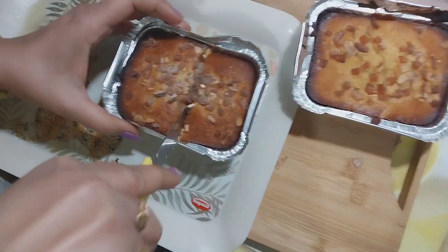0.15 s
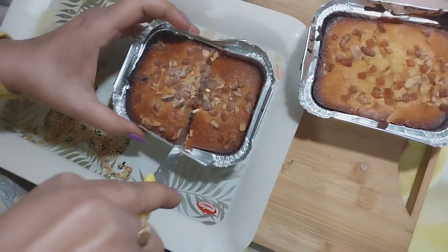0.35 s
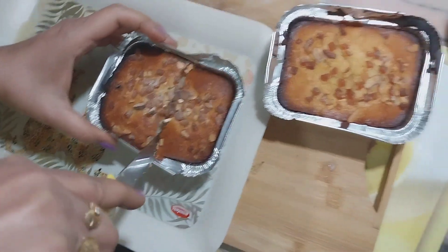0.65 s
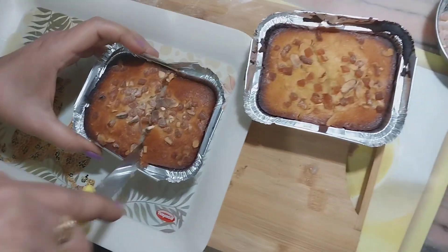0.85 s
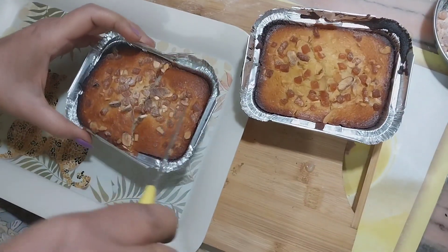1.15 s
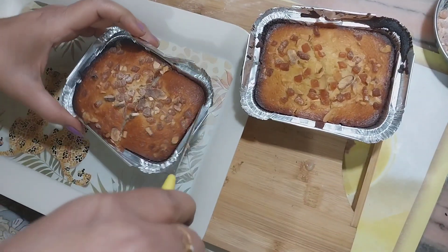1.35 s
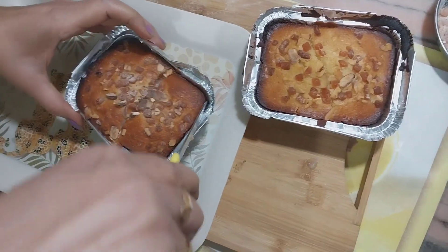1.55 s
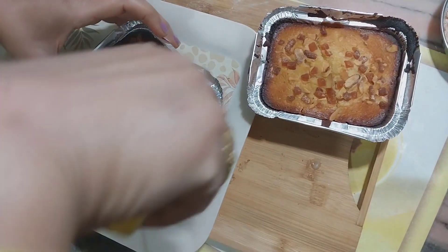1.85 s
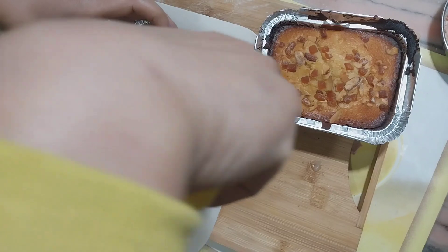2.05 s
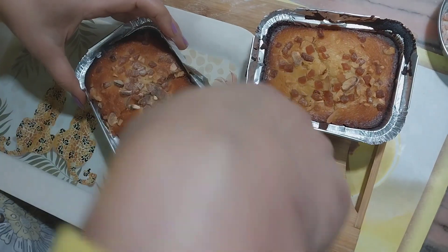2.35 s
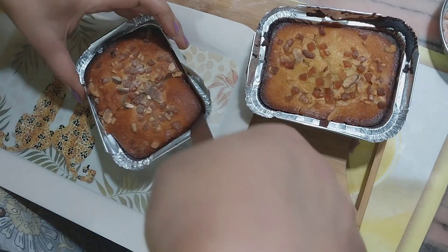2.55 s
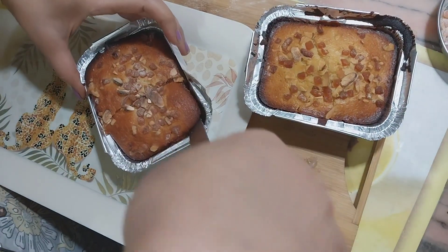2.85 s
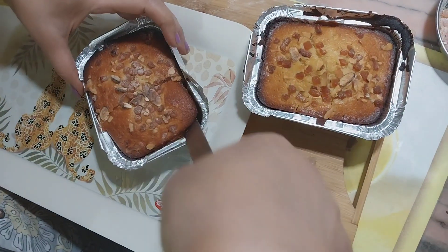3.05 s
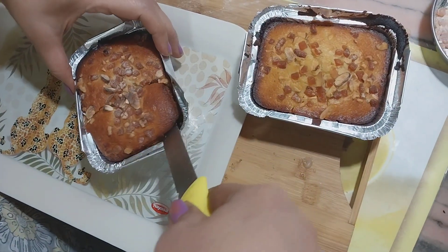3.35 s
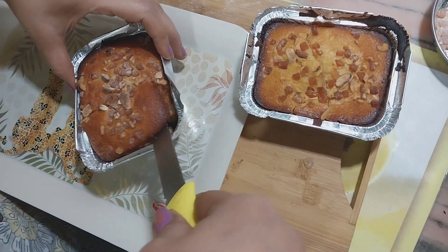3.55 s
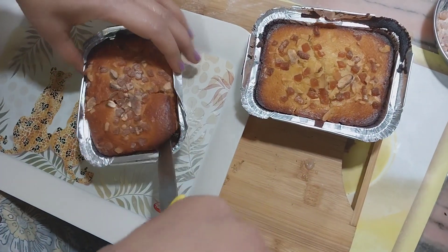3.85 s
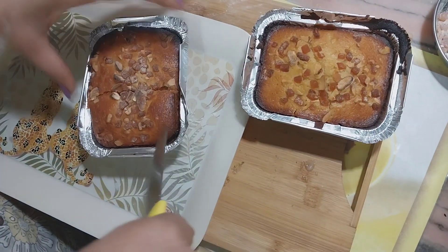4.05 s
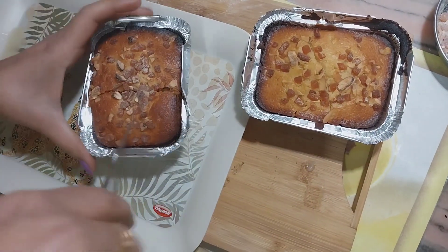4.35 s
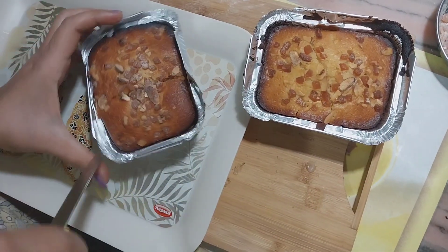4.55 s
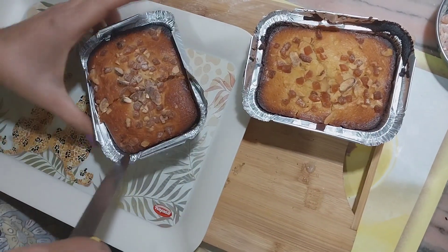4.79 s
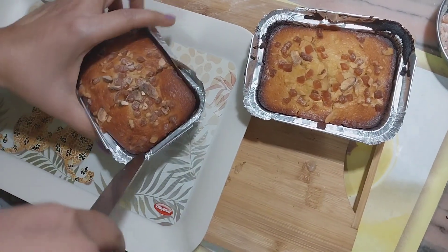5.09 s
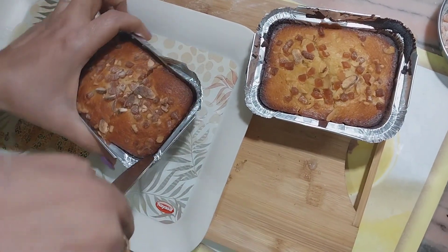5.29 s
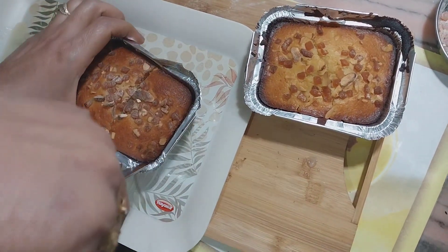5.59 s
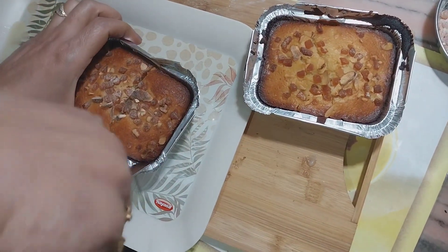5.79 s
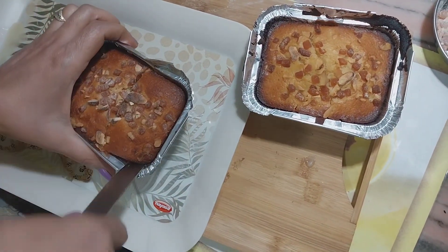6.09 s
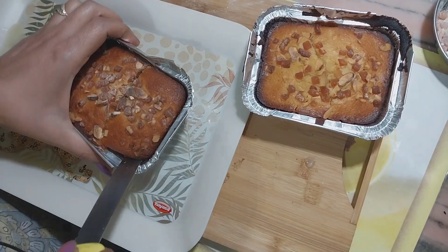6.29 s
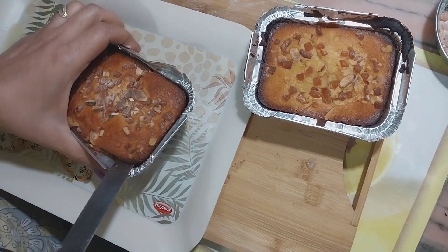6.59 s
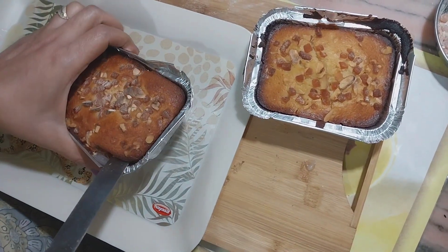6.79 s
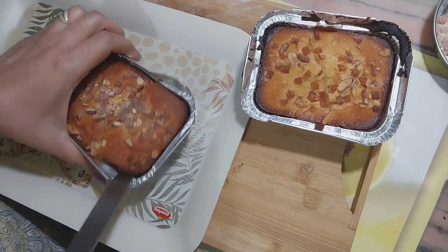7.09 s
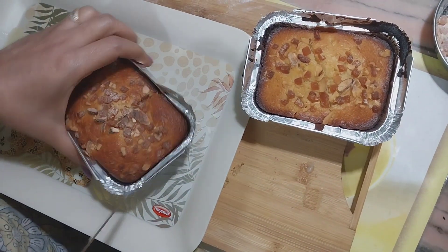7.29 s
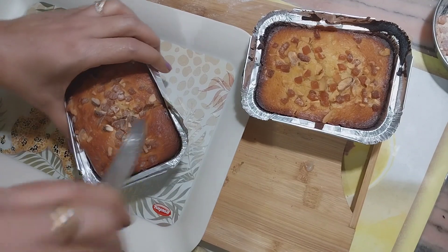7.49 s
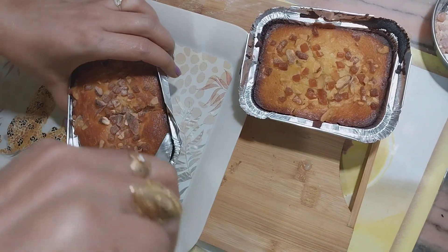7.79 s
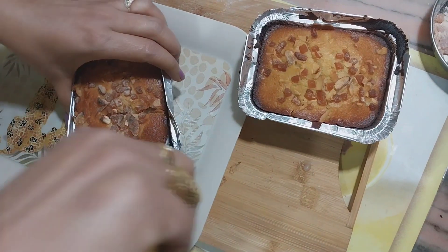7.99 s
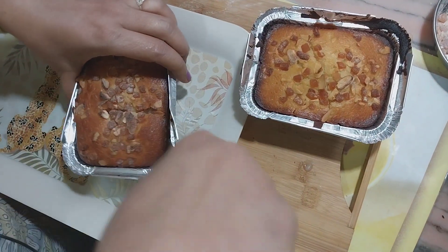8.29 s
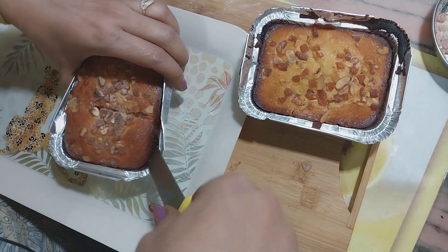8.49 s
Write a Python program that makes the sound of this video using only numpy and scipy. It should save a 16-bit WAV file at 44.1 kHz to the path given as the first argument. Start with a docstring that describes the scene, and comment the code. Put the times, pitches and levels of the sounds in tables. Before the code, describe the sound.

Silence until about 0.75 s, when quiet room air and hiss start abruptly with a knife sliding over a foil rim, ending in a tick near 1.1. Light ticks and faint scrapes follow at 1.6-2.3, then duller knocks with a soft tray boom around 2.4. Scrapes and ticks cluster at 2.8-3.1, with a slight blade ring; a quiet gap follows. At 3.9 the pan clacks, then scrapes, ticks and rubbing continue, with sharp clicks at 4.5-4.8. A calmer stretch has soft dragging, then snaps at 5.5 and a dull bump at 5.6. Rougher foil scraping around 6.0 leads to the loudest clack and low boom at 6.2, then pan rubs and ticks to 6.8. A swelling scrape at 7.3 ends in hard knocks at 7.45. Sparse faint strokes follow, with a last tick and thump at 8.4. Close, dry, short kitchen echo.

```python
"""In a quiet kitchen, a table knife works a baked cake loose from its foil tray on a plastic serving tray.
The blade slides, scrapes and judders as filtered stick-slip grains; ticks and crinkles are dispersed pushes.
The pan rubs as grains and clacks as decaying modes; the serving tray rumbles as noise and booms as modes.
Blade and foil carry a short echo to a microphone close above; the sound cuts in after a silent start."""
import sys
import numpy as np
from scipy import signal
from scipy.fft import rfft, irfft, next_fast_len
from scipy.io import wavfile

SR = 44100
rng = np.random.default_rng(int(sys.argv[2]) if len(sys.argv) > 2 else 0)


def bounce(signal):
    """Save signal as a 16-bit WAV file at the path given by the first command-line argument."""
    frames = np.transpose(np.atleast_2d(signal))
    limited = np.clip(frames, -1, 1)
    pcm = np.round(limited * 32767).astype(np.int16)
    wavfile.write(sys.argv[1], SR, pcm)


N = 381024
TIME = np.arange(N) / SR  # s
START_S, TOP_HZ = .745, 15600  # moment the sound switches on, upper band limit
ATTACK_S, RELEASE_DB_PER_S = 0.014, 340  # blade strokes
SHOVE_ATTACK_S, SHOVE_RELEASE_DB_PER_S = 0.012, 182  # pan strokes
TICK_RING_DB = 11.5  # how far the touched spot's ring stands out


def undb(db):
    """Level to amplitude: 20 dB is a factor of ten."""
    return 10 ** (np.asarray(db) / 20)


def unit(x):
    """Normalisation: scale to an rms of 1."""
    return x / np.sqrt(np.mean(x ** 2))


def fade(t, t60):
    """Exponential damping: amplitude falls by 60 dB in t60 seconds."""
    return np.exp(-np.log(1000) * t / t60)


def add(track, s, sound):
    """Superposition: mix a sound into the track from time s."""
    i = int(s * SR)
    track[i:i + len(sound)] += sound[:N - i]


def colour(x, points, peaks=()):
    """Minimum-phase filtering: a smooth spectrum with resonant peaks, made causal through its cepstrum."""
    size = next_fast_len(len(x), real=True)
    f = np.fft.rfftfreq(size, 1 / SR)
    hz, db = np.transpose(points)
    curve = np.interp(np.log(f + 1), np.log(hz), db)
    for centre, width, boost in peaks:
        curve = curve + boost / (1 + (2 * (f - centre) / width) ** 2)
    cepstrum = irfft(np.log(undb(curve)), size)
    # fold the negative times onto the positive ones
    cepstrum[1:size // 2] *= 2
    cepstrum[size // 2 + 1:] = 0
    response = np.exp(rfft(cepstrum))
    return irfft(rfft(x, size) * response, size)[:len(x)]


def walk(rate):
    """Random modulation: straight lines join Gaussian values drawn rate times a second."""
    knots = rng.standard_normal(4096)
    return np.interp(TIME * rate, np.arange(len(knots)), knots)


def grains(rate, spread_db, patchy_db):
    """Stick-slip friction: tiny random slips of uneven size, with slowly varying strength."""
    hit = rng.random(N) < rate / SR
    size = undb(spread_db * np.minimum(rng.exponential(size=N), np.pi))
    sign = rng.choice([-1, 1], N)
    strength = undb(patchy_db * walk(90))
    return unit(hit * size * sign * strength)


def stroke(start, length, db, swell_db, attack, release):
    """Force envelope: a stroke bites, swells or eases to db at its end, then dies away."""
    gain = np.zeros(N)
    t = TIME[:int((length + .5) * SR)]
    swell = swell_db * (np.minimum(t / length, 1) - 1)
    level = db + swell - release * np.maximum(t - length, 0)
    add(gain, start, undb(level) * np.minimum(t / attack, 1))
    return gain


def blade_strokes(table):
    """Force and response: each blade stroke drives the pan's body and the thin contact in its own proportion."""
    body, edge = np.zeros(N), np.zeros(N)
    for start, length, db, swell_db, treble_db in table:
        gain = stroke(start, length, db, swell_db, ATTACK_S, RELEASE_DB_PER_S)
        body += gain
        edge += undb(treble_db) * gain
    return body, edge


def ring(events, modes):
    """Modal vibration: each (s, dB) blow starts the same decaying sine modes."""
    t, out = TIME[:SR // 2], np.zeros(N)
    tone = sum(undb(db) * np.sin(2 * np.pi * hz * t) * fade(t, t60) for hz, db, t60 in modes)
    for s, db in events:
        add(out, s, undb(db) * tone)
    return out


# Spectrum of the room air and hiss: pitch_hz, relative level_db [dB per Hz]
HUSH_SPECTRUM = [(15, -37), (25, -7), (86, 1), (209, -11), (267, -10), (389, -19), (1110, -16), (2300, -28),
                 (3340, -32), (4500, -30), (7100, -22), (9810, -27), (15500, -40)]


def hush(mid_db=-69, side_db=-11):
    """Partly coherent noise: still room air and microphone hiss, almost alike on both sides."""
    mid, side = (unit(colour(rng.standard_normal(N), HUSH_SPECTRUM)) for _ in range(2))
    return undb(mid_db) * (mid + undb(side_db) * side * np.array([[1], [-1]]))


# Level of the tray's low rumble under the hands: time_s, relative level_db
RUMBLE_LEVEL = [(0.85, -80), (0.93, -65.5), (1.47, -58), (3.21, -73), (3.55, -78.5), (4.09, -61.5),
                (5.29, -72), (5.59, -66), (6.17, -47.5), (6.37, -67.5), (7.15, -73), (7.34, -67),
                (7.88, -70), (8.62, -62.5)]
# Spectrum of the rumble: pitch_hz, relative level_db [dB per Hz]
RUMBLE_SPECTRUM = [(20, -14), (50, -27), (66, -5.5), (78, 9.5), (95, -7.5), (130, -11.5), (200, -7.5),
                   (500, -76)]
# Pan dragged and turned on the tray: start_s, length_s, relative level_db at the end, swell_db from start to end
SHOVES = [(1.106, 0.33, -75.5, -17), (2.095, 0.39, -56, 5), (3, 0.073, -53, -8.5),
          (3.901, 0.032, -42.5, -11), (3.992, 0.51, -71.5, -13), (4.518, 0.047, -55.5, -3),
          (4.768, 0.88, -62, 1.5), (5.734, 0.61, -49.5, 1), (6.352, 0.21, -46.5, 14),
          (6.584, 0.075, -41, 3), (6.692, 0.26, -55, -6), (6.947, 0.14, -63, 10), (7.087, 0.4, -53, -2.5),
          (7.868, 0.052, -60.5, 9), (8.116, 0.17, -59.5, 6), (8.422, 0.083, -56.5, -5.5)]
# Spectrum of the rubbing pan: pitch_hz, relative level_db [dB per Hz]
RUB_SPECTRUM = [(50, -10.5), (150, -2), (260, -7.5), (430, -5.5), (680, -6), (950, -8), (1400, -18.5),
                (2300, -51), (6000, -47)]
# Resonances of the pan dragged over the tray: pitch_hz, width_hz, boost_db
RUB_PEAKS = [(267.8, 58, 16.5), (352.2, 26, 10.5), (628, 74, 8), (650, 110, -2.5), (1180, 23, 8),
             (1358, 46, 13.5), (1860, 68, 13)]


def rub(rub_db=-4.5, rumble_db=-2.0, drag_rumble_db=-19):
    """Sliding friction: the pan drags and turns; the tray rumbles below it, more so during a shove."""
    drag = sum(stroke(*shove, SHOVE_ATTACK_S, SHOVE_RELEASE_DB_PER_S) for shove in SHOVES)
    under_hands = undb(rumble_db + np.interp(TIME, *np.transpose(RUMBLE_LEVEL)))
    weight = under_hands + undb(drag_rumble_db) * drag
    slips = colour(grains(rate=980, spread_db=0.5, patchy_db=-1.0), RUB_SPECTRUM, RUB_PEAKS)
    rumble = colour(rng.standard_normal(N), RUMBLE_SPECTRUM)
    return undb(rub_db) * drag * unit(slips) + weight * unit(rumble)


# Spectrum of the pan as a whole under friction: pitch_hz, relative level_db [dB per Hz]
BODY_SPECTRUM = [(100, -19.5), (400, -15.5), (800, -1), (1200, -3.5), (2000, -0.5), (3000, -6),
                 (5000, -12.5), (15000, -44.5)]
# Spectrum of the thin metal at the contact: pitch_hz, relative level_db [dB per Hz]
EDGE_SPECTRUM = [(500, -50), (1800, 3.5), (3200, 8.5), (5000, 5), (7500, 0), (10000, -3.5), (15000, -13.5)]


def friction(effort, peaks, slips, body_db, edge_db):
    """Friction-driven resonance: slips sound the pan as a whole and the thin metal at the contact."""
    body_effort, edge_effort = effort
    body = body_effort * unit(colour(slips, BODY_SPECTRUM, peaks))
    edge = edge_effort * unit(colour(slips, EDGE_SPECTRUM, peaks))
    return undb(body_db) * body + undb(edge_db) * edge


# Flat of the blade sliding out over the rim:
# start_s, length_s, relative level_db at the end, swell_db from start to end, treble_db re level
SLIDES = [(.75, 0.063, -64.5, -4, -1), (.86, 0.053, -54.5, 4, -3), (1.045, 0.046, -49.5, 16, -1)]
# Resonances of the sliding blade: pitch_hz, width_hz, boost_db
SLIDE_PEAKS = [(1038, 91, 14), (1744, 86, 8.5), (2330, 230, 9.5), (3130, 830, 7.5), (4200, 130, -2),
               (5990, 110, 12), (7140, 730, 11), (8230, 150, 8)]


def slide():
    """Dense stick-slip: the blade is drawn smoothly out over the rim, then leaves it."""
    slips = grains(rate=3800, spread_db=1.5, patchy_db=1.0)
    return friction(blade_strokes(SLIDES), SLIDE_PEAKS, slips, body_db=3.0, edge_db=3.0)


# Resonances of one patch of foil wall: pitch_hz, width_hz, boost_db
FOIL_PEAKS = [(1143, 57.5, 13), (1710, 33, 1.5), (2520, 17, 2.5), (3636, 68, 5.5), (3980, 330, -1.5),
              (5400, 83, -32), (6460, 550, 18.5), (8550, 190, 5), (10470, 990, 14)]


def patch(shift):
    """Scattered resonance: in another patch of foil each mode lies a little higher or lower."""
    return [(hz * np.exp(shift * rng.standard_normal()), width, db) for hz, width, db in FOIL_PEAKS]


def bend(x, travel_s=0.00118, reference_hz=1000):
    """Dispersion: bending waves carry the treble faster, so a push arrives as a tiny falling chirp."""
    f = np.fft.rfftfreq(len(x), 1 / SR)
    phase = -2j * np.pi * travel_s * np.sqrt(f * reference_hz)
    return irfft(rfft(x) * np.exp(phase), len(x))


# Resonances of the filled pan on the tray, also heard in the scrape: pitch_hz, width_hz, boost_db
PAN_PEAKS = [(260, 84, -6), (326, 26, 19.5), (551, 45, 4), (746, 32, 5.5), (1110, 72, 3), (1355, 28, 7.5),
             (1585, 60, 4), (1820, 37.3, 5.5), (2544, 13, 10), (7240, 590, 1)]


def snap(thud_db, slope_db, hz, crumple_db=-3, crumple_t60=0.036, push_hz=4500, bass_db=-9, top_db=-11,
         ring_q=6, widest_hz=500, wall_share=0.56):
    """Impulsive buckling: a short push and a brief crumple of a crease ring the touched spot and the pan."""
    t = TIME[:4096]
    push = np.exp(-2 * np.pi * push_hz * t)
    crumple = rng.standard_normal(len(t)) * fade(t, crumple_t60)
    contact = bend(push / push.sum()) + undb(crumple_db) * crumple / np.linalg.norm(crumple)
    high, air = 1.42 * slope_db, 2.5 * slope_db  # octaves above the middle of the spectrum
    tone = [(30, thud_db - 15), (160, thud_db + bass_db), (520, thud_db), (1150, 2.5), (1800, -2.5),
            (3200, high), (5000, high - 2.1), (8000, air), (15000, air + top_db)]
    spot = (hz, min(hz / ring_q, widest_hz), TICK_RING_DB)
    # only the upper wall resonances are used, differing from spot to spot; the pan supplies the lower ones
    wall = [(f, width, wall_share * db) for f, width, db in patch(shift=0.098)[3:]]
    return colour(contact, tone, [spot, *PAN_PEAKS, *wall])


# Blade and foil ticks: start_s, relative level_db, thud_db of the pan re level,
# treble slope [dB per octave], pitch_hz of the touched spot
TICKS = [(.7512, -28.5, -5, 1.5, 3390), (1.0573, -23.5, -13, 1, 7360), (1.096, -12, -29, -5, 1707),
         (1.5562, -15, -4, -2.5, 2950), (1.7468, -28, 5, -2, 1850), (1.799, -33.5, -2, 3.5, 9660),
         (1.902, -42, -7, 7, 9240), (1.848, -33.5, -25, 1.5, 1050), (1.9783, -31, -8, 2.5, 2570),
         (2.0278, -27, -25, 2, 9300), (2.0644, -26.5, -9, 0, 3640), (2.1681, -22.5, 0, 2, 1290),
         (2.2755, -24.5, 6, 0.5, 1300), (2.397, -15.5, -1, -7.5, 1150), (2.4299, -11, 4.5, -8, 1045),
         (2.8237, -16.5, -7, -4.5, 1750), (2.8448, -15.5, -11, -5, 1600), (2.9294, -16.5, -4, -1, 2430),
         (3.0043, -7, -2, -5, 1056), (3.104, -10.5, -5, -4, 2920), (3.9081, -2.5, 4, -16, 612),
         (4.0258, -21, -7, -8, 1350), (4.081, -11, -5, -6, 1100), (4.1301, -8, -14, 0, 1580),
         (4.219, -28, 16, -20, 300), (4.5272, -11, -12, -7, 1390), (4.597, -2, -22, -8, 3870),
         (4.7224, -14.5, -17, -4.5, 1240), (4.7321, -19, 11.5, -17, 980), (4.7702, -11.5, -17, 0, 1380),
         (4.7785, -2, -26, -6, 1920), (4.8132, -3.5, -6.5, -9, 994), (4.9628, -23.5, 5, -2.5, 1300),
         (5.069, -19.5, 0, -24, 1100), (5.4852, -10.5, -22, -3.5, 1870), (5.497, -3.5, -7, -2, 1830),
         (5.7135, -8.5, -4.5, 0, 1850), (5.7207, -12, 1, 1, 3550), (5.738, -10, 7, -1.5, 1230),
         (5.9315, -29.5, -1, 1.5, 636), (6.0131, -20, 8, 1, 790), (6.0626, -10.5, 10, 0, 1500),
         (6.1908, 10, 0, -15.5, 840), (6.2738, -7, 4, -15, 700), (6.2821, -7, -3, -9, 1230),
         (6.3288, -4.5, 0.5, -8, 680), (6.4423, -10, -5, -5, 7500), (6.5255, -12.5, 6, -9, 276),
         (6.6924, -9.5, 2, -7.5, 1840), (6.7836, -14, -27, -9, 1870), (6.8068, -4, -36, -8, 2120),
         (7.1124, -39.5, 14, 8, 5900), (7.3009, -19, 16, -1.5, 638), (7.3109, -9.5, 0, -12, 620),
         (7.4408, -1.5, -4, -2, 1770), (7.449, 3, 1, -3.5, 1770), (7.8481, -11, 1.5, -4, 1670),
         (8.176, -19.5, 5.5, -1.5, 1770), (8.208, -18.5, 9, 0, 1330), (8.4183, -4, -5, -7.5, 2050)]


def ticks(level_db=-7.0):
    """Impact excitation: the clear ticks of the blade on the foil."""
    out = np.zeros(N)
    for s, db, thud_db, slope_db, hz in TICKS:
        add(out, s, undb(level_db + db) * snap(thud_db, slope_db, hz))
    return out


# Strokes that judder in one resonance of the blade or the pan:
# middle_s, half_length_s [to 1/e], level_db before the room, pitch_hz, width_hz
JUDDERS = [(1.072, 0.025, -54, 3370, 420), (1.214, 0.16, -69.5, 437, 86.5), (1.663, .035, -63, 1140, 256),
           (4.343, 0.074, -65, 550, 125), (4.782, 0.0085, -41.5, 1920, 480), (5.01, .06, -69.5, 1355, 160),
           (5.497, 0.0023, -33, 1780, 288), (6.631, 0.059, -47, 642, 176), (7.68, 0.044, -65, 1120, 241),
           (8.007, 0.12, -71.5, 1400, 300), (8.095, .03, -60, 690, 220)]


def judders():
    """Resonant stick-slip: slips feed one resonance for the length of a stroke."""
    out = np.zeros(N)
    for s, length, db, hz, width in JUDDERS:
        resonance = signal.iirpeak(hz, hz / width, fs=SR)
        slips = grains(rate=2700, spread_db=3.0, patchy_db=-3.5)
        tone = signal.lfilter(*resonance, signal.lfilter(*resonance, slips))
        out += undb(db) * unit(tone) * np.exp(-((TIME - s) / length) ** 2)
    return out


# Blade edge scraping along the foil, also driving the crinkle:
# start_s, length_s, relative level_db at the end, swell_db from start to end, treble_db re level
SCRAPES = [(1.556, .2, -66, -10, -41), (1.842, .13, -76, -19.5, -20), (2.032, .27, -66, -3, -17),
           (2.373, .04, -49, 23, -27), (2.83, .04, -68, -4, -9), (2.983, .12, -49, 16, -18),
           (3.865, .045, -51.5, 12, -17), (3.998, .13, -40, 21, -15), (4.481, 0.049, -43.5, 3.5, -15),
           (4.608, .13, -64.5, 3, -2.5), (4.756, .04, -65, 7, -14), (4.963, .22, -71, -7, -9.5),
           (5.25, .22, -56.5, 6, -10), (5.478, 0.023, -41, 17, -14.5), (5.708, .012, -43.5, -23, -13),
           (5.993, .19, -39, 16, -21), (6.417, .05, -57, 7, -8.5), (6.669, 0.16, -61, 8, -20),
           (7.107, .17, -73.5, -4, -10), (7.279, .15, -37, 22.5, -14), (7.43, .018, -38, -2, -33),
           (7.496, 0.18, -72.5, -13, -13.5), (7.842, .22, -70.5, -11.5, -15), (8.069, .15, -51.5, 4.5, -18),
           (8.412, .2, -77, -19, -24)]


def scrape(count=6, change_db=10):
    """Shifting contact: the edge catches on pleats and crust, passing from one patch of foil to the next."""
    slips = grains(rate=2600, spread_db=1.0, patchy_db=3.0)
    touch = np.array([undb(change_db * walk(14)) for _ in range(count)])
    touch /= np.linalg.norm(touch, axis=0)  # squared shares add up to 1
    effort = blade_strokes(SCRAPES)
    patches = [friction(effort, PAN_PEAKS + patch(shift=0.1143), slips, body_db=-8.5, edge_db=1.5)
               for _ in range(count)]
    return np.sum(touch * patches, axis=0)


def crinkle(count=110, level_db=26, scatter_db=3, thud_db=-10, slope_db=-1, ring_hz=2600, loudest_db=-31):
    """Random buckling: pleats give way during scrapes, louder under a harder stroke, up to a limit."""
    out = np.zeros(N)
    force, _ = blade_strokes(SCRAPES)
    starts, lengths = np.transpose(SCRAPES)[:2]
    spent = np.cumsum(lengths)
    for share, (size, pitch) in zip(rng.random(count), rng.standard_normal((count, 2))):
        # a random moment of the total scraping time, placed back in its stroke
        moment = share * spent[-1]
        k = np.searchsorted(spent, moment)
        s = starts[k] + spent[k] - moment
        strength = min(undb(level_db) * np.interp(s, TIME, force), undb(loudest_db))
        gain = strength * undb(scatter_db * size)  # scatter comes after the limit
        add(out, min(s, TIME[-1]), gain * snap(thud_db, slope_db, ring_hz * np.exp(.5 * pitch)))
    return out


# Soft knocks that set the serving tray booming: start_s, relative level_db
KNOCKS = [(2.435, -39), (3.91, -46), (4.53, -68), (4.815, -49), (6.02, -44), (6.195, -28.5), (7.455, -39),
          (8.33, -50), (8.425, -46)]
# Boom of the serving tray: pitch_hz, relative level_db, t60_s
TRAY_MODES = [(75.2, -1.5, 0.3), (140, -16.5, 0.24), (168, -18, 0.25)]


def knocks(lowest_hz=55):
    """Radiation limit: the serving tray booms but is too small to radiate the deepest bass."""
    radiation = signal.butter(2, lowest_hz, "high", fs=SR, output="sos")
    return signal.sosfilt(radiation, ring(KNOCKS, TRAY_MODES))


# Flicks of the free blade: start_s, relative level_db
FLICKS = [(2.9304, -55.5), (4.5966, -63), (7.279, -62.5)]
# Ring of the blade: pitch_hz, relative level_db, t60_s
BLADE_MODES = [(1130, -1, 0.31), (1286, 1, 0.16), (1690, -4, 0.11), (2190, -17, 0.29), (2820, -3, 0.046),
               (3600, -18, 0.27), (6000, -4, 0.069), (5810, 5, 0.089), (5870, -10, 0.07), (8441, -7, 0.1),
               (9400, -9, 0.067)]


def flicks():
    """Free vibration: the flicked blade rings in its own modes."""
    return ring(FLICKS, BLADE_MODES)


# Clacks of the filled pan as it slips down: start_s, relative level_db
CLACKS = [(3.9085, -47), (6.1911, -24.5), (6.3292, -66), (7.4405, -44)]
# Modes of the clacking pan: pitch_hz, relative level_db, t60_s
PAN_MODES = [(344, -46, 0.08), (538, -7.5, 0.14), (740, -7.5, 0.2), (762, -5, 0.081), (1117, -22, 0.0095),
             (1230, 7, .02), (1500, -44, 0.015)]


def clacks():
    """Damped modal impact: the filled pan slips and clacks down."""
    return ring(CLACKS, PAN_MODES)


# Dull bumps of the hand: middle_s, level_db, pitch_hz, half_length_s [to 1/e]
BUMPS = [(5.602, -36.5, 113, 0.0037)]


def bumps():
    """Heavily damped impact: a padded push that dies within two swings."""
    out = np.zeros(N)
    for s, db, hz, length in BUMPS:
        swing = -np.cos(2 * np.pi * hz * (TIME - s))
        out += undb(db) * swing * np.exp(-((TIME - s) / length) ** 2)
    return out


def kitchen(x, wet_db, low_t60=0.24, high_t60=0.21, split_hz=3000):
    """Reverberation: dense reflections from the table and walls; the treble dies first."""
    t = TIME[:SR // 2]
    low_pass = signal.butter(2, split_hz, fs=SR, output="sos")
    high_pass = signal.butter(2, split_hz, "high", fs=SR, output="sos")
    low = signal.sosfilt(low_pass, rng.standard_normal(len(t)))
    high = signal.sosfilt(high_pass, rng.standard_normal(len(t)))
    onset = np.clip(t / 0.0014 - .5, 0, 1)  # rises from 0.7 to 2.1 ms
    echo = (low * fade(t, low_t60) + high * fade(t, high_t60)) * onset
    return x + undb(wet_db) * signal.fftconvolve(x, echo / np.linalg.norm(echo))[:N]


def scene():
    """Superposition: all sources add straight below the microphone; only blade and foil are given echo."""
    snaps = kitchen(ticks() + crinkle(), wet_db=-2.5)
    scrapes = kitchen(slide() + scrape() + judders() + flicks(), wet_db=-9.5)
    return snaps + scrapes + clacks() + rub() + knocks() + bumps() + hush()


def record(dry, low_cut_hz=38):
    """Band limiting: deepest bass and top treble are cut, the lows lean right, the sound starts abruptly."""
    heard = signal.sosfilt(signal.butter(2, low_cut_hz, "high", fs=SR, output="sos"), dry)
    lean = .26 * signal.sosfiltfilt(signal.butter(1, 330, fs=SR, output="sos"), heard)
    sound = (heard + lean * np.array([[-1], [1]])) * (TIME >= START_S)
    return signal.sosfilt(signal.ellip(10, .2, 70, TOP_HZ, fs=SR, output="sos"), sound)


dry = scene()
out = record(dry)
bounce(out)
```